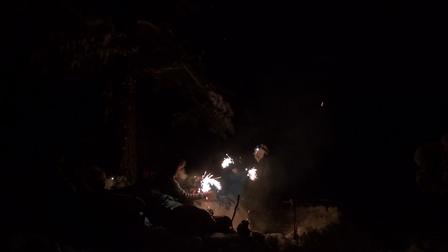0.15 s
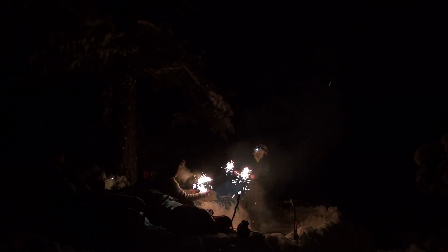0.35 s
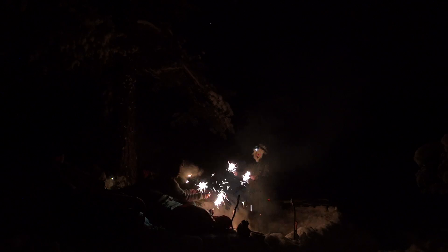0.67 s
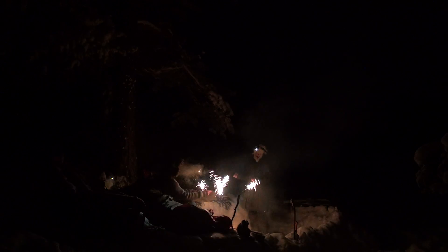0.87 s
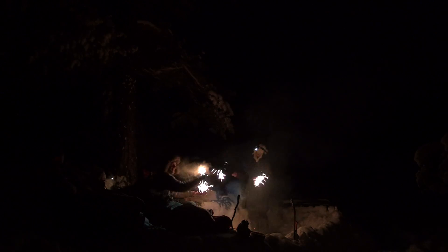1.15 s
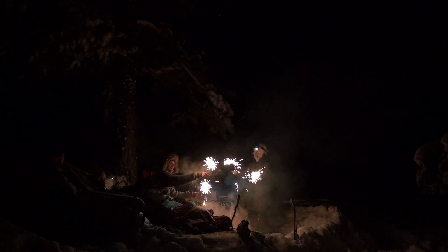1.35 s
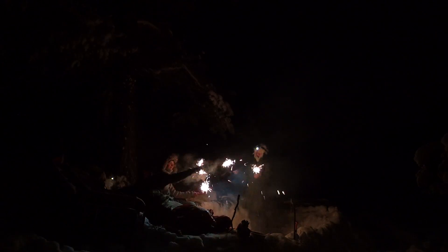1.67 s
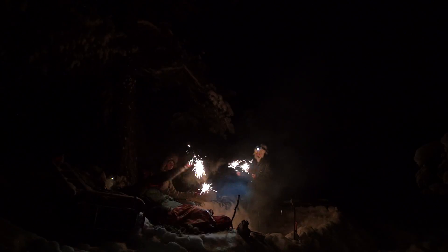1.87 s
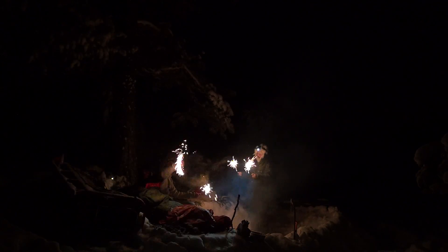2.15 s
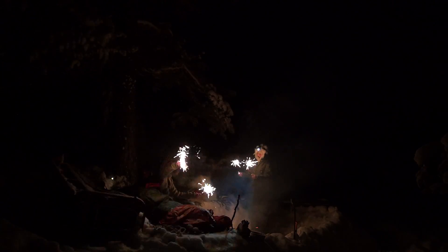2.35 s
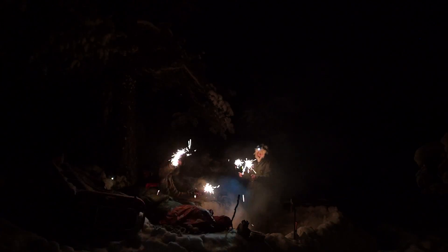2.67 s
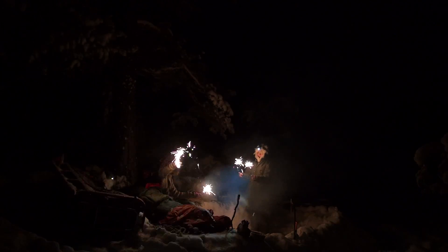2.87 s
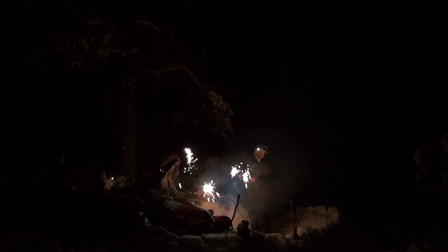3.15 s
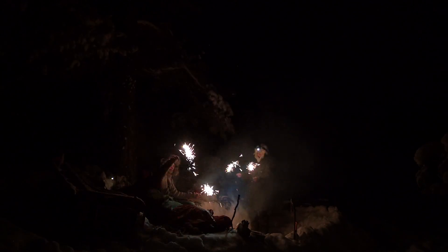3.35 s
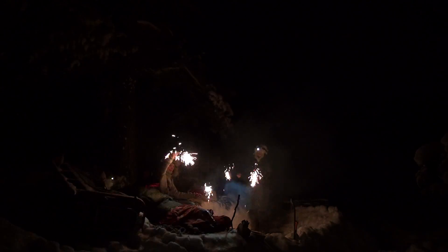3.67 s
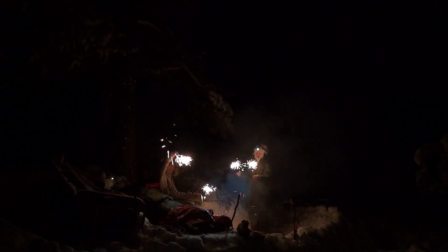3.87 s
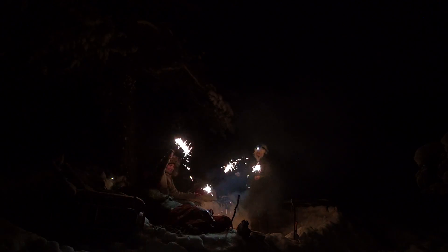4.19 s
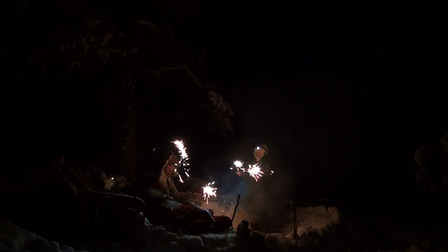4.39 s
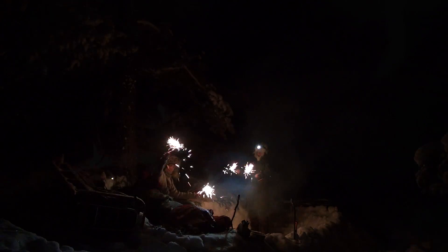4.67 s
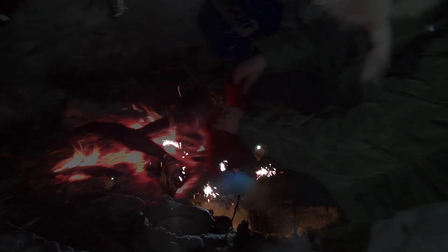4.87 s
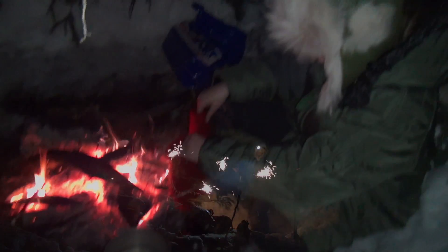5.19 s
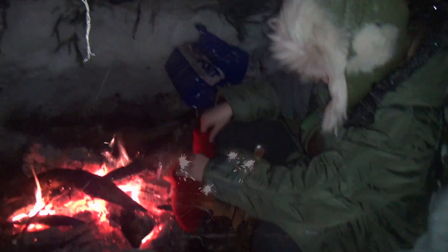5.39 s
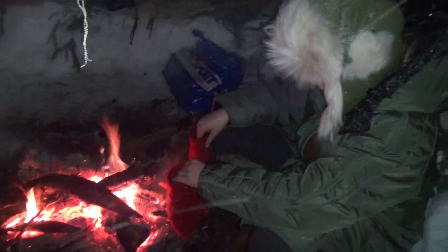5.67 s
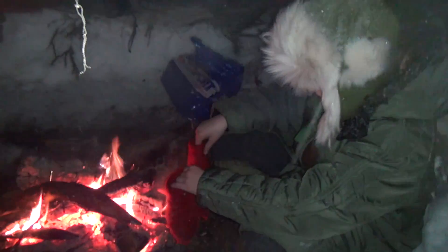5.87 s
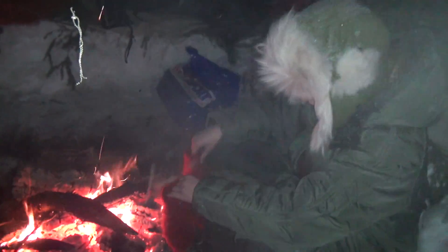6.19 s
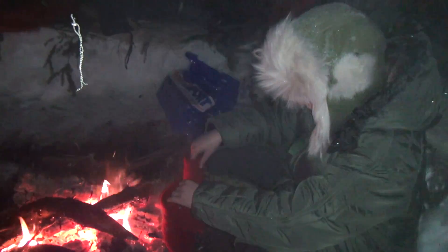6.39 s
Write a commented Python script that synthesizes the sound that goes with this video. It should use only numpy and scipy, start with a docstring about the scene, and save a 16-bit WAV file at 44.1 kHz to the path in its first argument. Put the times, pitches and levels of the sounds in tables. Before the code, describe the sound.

A bright, flickering sparkler hiss with sudden cracks and dull distant fire pops gives way to quiet nearby crackling embers and someone's soft scuffs.

```python
"""A clearing on a still winter night: sparklers fizz a few steps away, as rushing gas and sputtering specks of noise.
Now and then a spark bursts in a sharp crack; the ground answers at once, the nearby trees swell a moment later.
A campfire pops dully behind them, each pop one blunt filtered pulse. The fizz fades as the fire comes close:
a soft flame murmur of low noise, snapping wood made of pulses through resonances, and faint ticks.
Someone tends it with dull knocks, grainy crunches, a sliding sleeve and a rustle of stirred embers."""
import sys
import numpy as np
from scipy import signal
from scipy.fft import rfft, irfft, next_fast_len
from scipy.io import wavfile
from scipy.ndimage import map_coordinates

SR = 44100
rng = np.random.default_rng(int(sys.argv[2]) if len(sys.argv) > 2 else 0)


def master(y):
    """Save y as 16-bit WAV."""
    cut = np.clip(np.atleast_2d(y).T, -1, 1)
    pcm = np.round(cut * 32767)  # scale
    wavfile.write(sys.argv[1], SR, pcm.astype(np.int16))


N = 287973
T = np.arange(8192) / SR  # time axis of one short sound, s


def amp(db):
    """Decibels to gain."""
    return 10 ** (np.asarray(db) / 20)


def unit(x):
    """Scaled to rms 1."""
    return x / np.sqrt(np.mean(x ** 2) + 1e-20)


def along(points, hz):
    """Points of (frequency, value) read on a log frequency axis."""
    point_hz, value = np.transpose(points)
    return np.interp(np.log(hz + 1), np.log(point_hz + 1), value)


def curves(rows):
    """One value per sample for each column after the time."""
    times_s, *columns = np.transpose(rows)
    return [np.interp(np.arange(N) / SR, times_s, column) for column in columns]


def wobble(rate):
    """A smooth random curve with this many knots a second."""
    knots = rng.standard_normal(int(N * rate / SR) + 4)
    return map_coordinates(knots, [np.arange(N) * rate / SR])


def ramp(start_s, length_s):
    """A straight rise from 0 to 1, one value per sample."""
    return np.clip((np.arange(N) / SR - start_s) / length_s, 0, 1)


def filtered(x, response):
    """x times a response of frequency."""
    n = x.shape[-1]
    padded = next_fast_len(n + len(T))
    hz = np.fft.rfftfreq(padded, 1 / SR)
    return irfft(rfft(x, padded) * response(hz), padded)[..., :n]


def coloured(x, spectrum):
    """x shaped by (Hz, dB) points, at rms 1."""
    return unit(filtered(x, lambda hz: amp(along(spectrum, hz))))


def struck(x, spectrum):
    """A short sound through a minimum-phase filter of (Hz, dB) points: nothing comes before the attack."""
    n = len(x)
    cepstrum = irfft(np.log(amp(along(spectrum, np.fft.rfftfreq(n, 1 / SR)))))
    # folding the cepstrum onto positive time makes the filter causal
    fold = np.r_[1, np.full(n // 2 - 1, 2), 1, np.zeros(n // 2 - 1)]
    return irfft(rfft(x) * np.exp(rfft(cepstrum * fold)))


def resonances(modes, hz):
    """The causal response of modes given as (Hz, width Hz, dB)."""
    return sum(amp(db) * 1j * hz * width / (centre ** 2 - hz * hz + 1j * hz * width)
               for centre, width, db in modes)


def dying(t60):
    """Noise of energy 1 that falls by 60 dB in t60 seconds."""
    x = rng.standard_normal(len(T)) * amp(-60 * T / t60)
    return x / np.linalg.norm(x)


def grains(rate, spread_db):
    """Random one-sample impulses of log-normal size and either sign, rate a second, at rms 1."""
    size = amp(spread_db * np.clip(rng.standard_normal(N), -3, 2.6))
    hits = rng.random(N) < rate / SR
    return unit(hits * size * rng.choice([-1, 1], N))


def add(track, s, x):
    """Mix x into the track at time s."""
    part = track[max(round(s * SR), 0):][:len(x)]
    part += x[:len(part)]


def ports(source, width):
    """Two microphone ports share one take of a source; a second, scattered take splits them in level and phase."""
    mid = source()
    side = filtered(source(), lambda hz: amp(along(width, hz)) * np.exp(0.9j))
    return np.array([mid + side, mid - side])


def sparklers():
    """Gas rushes from the burning coats while thousands of metal specks flare; both sputter together."""
    # how fiercely they burn: start_s [s], burn_db [dB], before the trim and the fade
    burn = [(0.0, -51), (0.29, -52.5), (0.34, -49), (0.5, -51), (0.57, -48), (0.78, -49), (0.98, -51),
            (1.28, -51), (1.47, -48.5), (1.66, -51), (1.85, -48), (2.22, -50), (2.69, -50.5), (2.95, -48.5),
            (3.23, -50.5), (3.72, -48.5), (3.86, -50.5), (4.03, -48), (4.16, -49), (4.5, -48.5),
            (4.63, -46.5), (4.78, -49), (4.82, -47.5), (5.0, -47.5)]
    # gas rush, broad and mid-heavy: pitch_hz [Hz], level_db [dB per Hz]
    rush_spectrum = [(100, -36), (300, -15), (520, -6.5), (780, -1.5), (1100, -.5), (1800, 0), (2500, -1.5),
                     (3500, -3.2), (5000, -9), (8000, -22), (16000, -45)]
    # sizzling specks, mostly treble: pitch_hz [Hz], level_db [dB per Hz]
    sizzle_spectrum = [(1500, -26), (2600, -8.5), (3600, -7.5), (5000, -7), (6200, -0.5), (7300, 1),
                       (8800, -3), (10700, 0), (12200, -1), (13400, -11), (14500, -5.5), (15700, -10)]
    rush_mean_db, rush_follows = -52.5, 0.805  # before the fade; share of each flare-up in dB
    sizzle_trim_db = 0.47
    fade_start_s, fade_s, rush_fade_db, sizzle_fade_db = 4.712, 1.02, 16, 18

    burn_db, = curves(burn)
    gone = ramp(fade_start_s, fade_s)
    rush_db = rush_mean_db + rush_follows * (burn_db - burn_db.mean()) - rush_fade_db * gone
    sizzle_db = sizzle_trim_db + burn_db - sizzle_fade_db * gone
    # slow surges and quick sputter, in dB
    sputter_db = 0.7 * wobble(14) + 0.95 * wobble(90)

    specks = grains(rate=2500, spread_db=2.5)
    tails = signal.fftconvolve(specks, dying(t60=0.0051))[:N]
    specks = unit(specks + amp(-2.5) * tails)
    # a few larger specks fork with a distinct tick
    forks = amp(-12.5) * grains(rate=130, spread_db=2.5)
    rush = coloured(unit(rng.standard_normal(N) + amp(-10.0) * specks) + forks, rush_spectrum)
    sizzle = coloured(unit(rng.standard_normal(N) + amp(-0.5) * specks) + forks, sizzle_spectrum)
    return amp(rush_db + sputter_db) * rush + amp(sizzle_db + sputter_db) * sizzle


def nearness():
    """0 until the close fire is first heard, 1 once it is fully close."""
    first_s, close_s = 4.8, 6.47
    return ramp(first_s, close_s - first_s)


def murmur():
    """Night air gives way to close flames; both flutter softly as low noise."""
    # draught of the close flames: start_s [s], level_db [dB], before the flutter and the approach
    draught = [(5.4, -54.5), (5.512, -54), (5.908, -66.5), (6.164, -62.5), (6.53, -59)]
    # low flame noise: pitch_hz [Hz], level_db [dB per Hz]
    flame_spectrum = [(25, -52), (70, -24.5), (130, -8.5), (230, -5), (400, -1), (560, 2), (720, 2),
                      (1000, 0.5), (1200, -17), (1800, -9), (4000, -26.5)]
    air_db = -66.5

    draught_db, = curves(draught)
    near = nearness()
    level = (1 - near) * amp(air_db) + near * amp(draught_db)
    flutter = amp(2.2 * wobble(18))
    return level * flutter * coloured(rng.standard_normal(N), flame_spectrum)


def weights(level_db, bright_db, body_db):
    """Low, middle and high weight of a pop: brightness tips the balance, body lifts the middle."""
    return level_db - bright_db, level_db + body_db, level_db + bright_db


def pop(excitation, thump_db, crack_db, snap_db):
    """A burst coloured by its weight in the low, middle and high range."""
    low = [(30, thump_db - 42.5), (230, thump_db - 14.0), (600, thump_db - 7.5),
           (1200, thump_db - 0.5), (2000, (thump_db + crack_db) / 2 - 1.0)]
    middle = [(2750, crack_db - 4), (3700, crack_db - 1.5), (5100, crack_db - 5.0)]
    high = [(7400, snap_db + 0.5), (10800, snap_db - 8.5), (13400, snap_db - 11.5), (15000, snap_db - 15.0)]
    return struck(excitation, low + middle + high)


def bursts():
    """A spark bursts in a pulse and a short spray; the ground returns it and the trees scatter it."""
    # bursting sparks: start_s [s], level_db [dB], bright_db [dB], spray_db [dB against the pulse],
    # ground_db [dB, ground echo], trees_db [dB, answer of the trees]; levels before filtering
    sparks = [(.058, -23.5, 3, 2, -4, -3), (.6455, -20, 4, 0, -9, -6.5), (0.8592, -14, 2, -1.5, 0.5, 5),
              (2.0542, -5, 0.5, -9.5, -8, -5), (2.4529, -14.5, 1, -7, -11.5, -1.5),
              (2.6145, -16.5, -0.5, -18, -14, -7), (3.261, -3.5, 1.5, 7, 0.5, 3.5),
              (3.5785, -11.5, 0.5, -1.5, -3, -4), (4.917, -19, -1.5, -13, -18.5, -15),
              (5.034, -26.5, -5, -12.5, -20, -5.5)]
    bounce_delay_s = 0.0046
    # the late answer drops quickly: twigs peak first in the treble, trunks later and lower
    twigs = np.interp(T, [.015, .02, .026, .08], [0.68, 1.0, 0.3, 0.1])
    trunks = np.interp(T, [.008, .022, .04, .046], [0.1, 0.55, 1.5, 0.45])

    out = np.zeros(N)
    for s, level_db, bright_db, spray_db, ground_db, trees_db in sparks:
        # a burst with more spray has more weight in the middle range
        body_db = 3 + 0.45 * spray_db
        thump_db, crack_db, snap_db = weights(level_db, bright_db, body_db)
        burst = (T == 0) + amp(spray_db) * dying(t60=0.0084)
        add(out, s, pop(burst, thump_db, crack_db, snap_db))

        # rough ground mirrors part of the burst, smears the rest and sends back mostly treble
        mirrored = .6 * burst / np.linalg.norm(burst)
        smeared = 1.13 * dying(t60=0.026)
        bounce = pop(mirrored + smeared, thump_db - 2.5, crack_db - 3.0, snap_db + 7.0)
        add(out, s + bounce_delay_s, amp(ground_db) * bounce)

        # single trunks and branches make the late answer ragged
        ragged_db = 3.0 * map_coordinates(rng.standard_normal(len(T)), [T * 500])
        ragged = amp(trees_db + ragged_db - 1.4)
        from_twigs = twigs * ragged * dying(t60=0.16)
        from_trunks = trunks * ragged * dying(t60=0.2)
        add(out, s, pop(from_twigs, thump_db - 4, crack_db + 1, snap_db + 2))
        add(out, s, pop(from_trunks, thump_db + 5, crack_db + 3.5, snap_db - 5))
    return out


def thuds():
    """Wood pops dully in the distant fire: one blunt pulse with a short noise tail, peaking at its pitch."""
    # distant pops: start_s [s], level_db [dB before filtering], pitch_hz [Hz, spectral peak]
    distant_pops = [(0.297, -16, 403), (2.087, -5.5, 1400), (2.687, -13.5, 2100), (3.687, -9, 650),
                    (3.8855, -6, 1700), (4.228, -12.5, 1480)]
    out = np.zeros(N)
    for s, level_db, hz in distant_pops:
        colour = [(30, -36), (140, -15), (hz / 2, -3), (hz, 0), (2 * hz, -7), (4 * hz, -20), (16000, -30)]
        pulse = (T == 0) + amp(-11) * dying(t60=0.02)
        add(out, s, amp(level_db) * struck(pulse, colour))
    return out


def campfire():
    """Pockets of steam split the wood and ring it briefly; faint ticks grow as the fire nears."""
    # snaps of burning wood: start_s [s], level_db [dB before filtering], bright_db [dB], body_db [dB],
    # pitch_hz [Hz, note of the splitting piece], note_db [dB]
    embers = [(5.124, -22, -2, 1, 7830, 4), (5.221, -19.5, 0.5, -4, 1980, 9.5),
              (5.241, -30, 5, -2, 9000, 4), (5.2958, -31, 8, -13, 10500, 6),
              (5.328, -31, -7, -2, 1700, 7.5), (5.573, -17.5, -10, 0, 1340, 8.5),
              (5.581, -28, 6.5, -3, 10500, 3), (5.6395, -14.5, 6, 5, 1180, 15),
              (5.7048, -25.5, 3.5, -1.5, 10500, 3), (5.7215, -28.5, 6.5, 2, 4000, 2),
              (5.766, -33, 5.5, -2, 7500, 5), (5.8343, -30.5, 5, 3.5, 5000, 5),
              (5.88, -30.5, 5, -3, 10200, 5), (5.978, -31, 5.5, -3, 10000, 4),
              (6.007, -27, 7.5, 1, 1650, 12), (6.018, -35, 8, -5, 11000, 5),
              (6.0685, -35, 7.5, -5.5, 11000, 4), (6.08, -32, 4, 0, 10500, 4),
              (6.1139, -12.5, -1.5, 0, 10200, 15.5), (6.119, -30, 0, -0.5, 10500, 7),
              (6.1336, -22, -6, 3.5, 980, 13), (6.147, -28, 4, -1, 11000, 3),
              (6.1503, -25.5, -15, 3, 2600, 15), (6.2376, -26.5, -6, 1, 1080, 5),
              (6.2572, -30.5, 6, 0, 5000, 2), (6.298, -33.5, 5, -5.5, 7500, 6.5),
              (6.3253, -27.5, 7, 4.5, 3720, -2.5), (6.33, -29.5, -9, 5, 1700, 13),
              (6.4104, -28.5, 1, 12.5, 3780, 13), (6.426, -34, 0, 9, 4300, 4),
              (6.4585, -30, -4, 3.5, 3000, 3), (6.479, -28, 1.5, -2, 1600, 6),
              (6.505, -26, 5.5, 7.5, 2350, 10)]
    # resonances of the firewood: pitch_hz [Hz], width_hz [Hz], level_db [dB]
    wood_modes = [(910, 470, 4.5), (2690, 620, 4), (3650, 410, -1), (5260, 680, 0), (7480, 400, -3.5),
                  (10200, 1830, 3.5)]
    note_q = 13  # frequency of a piece's own note over its width
    neutral_t60_s, doubling_db = 0.016, 14  # ringing of a neutral snap; loss of brightness that doubles it
    ring_at_0_db, ring_growth = 8.5, 0.356  # a stronger snap rings the wood more: dB, dB per dB

    snaps = np.zeros(N)
    for s, level_db, bright_db, body_db, note_hz, note_db in embers:
        modes = [*wood_modes, (note_hz, note_hz / note_q, note_db)]
        thump_db, crack_db, snap_db = weights(level_db, bright_db, body_db)
        ring_db = ring_at_0_db + ring_growth * level_db
        # duller snaps, as from thicker pieces, ring longer
        t60 = neutral_t60_s * 2 ** (-bright_db / doubling_db)
        blow = 0.55 * (T == 0) + 0.64 * dying(t60)
        ring = amp(ring_db) * filtered(blow, lambda hz: 0.2 + resonances(modes, hz))
        split = 0.31 * (T == 0) + 0.5 * dying(t60=0.004)
        add(snaps, s, pop(split + ring, thump_db, crack_db, snap_db))

    ticks = grains(rate=45, spread_db=1.5)
    ticks = ticks + signal.fftconvolve(ticks, dying(t60=0.015))[:N]
    ticks = coloured(ticks, [(200, 4), (1200, -19), (4000, 1), (11000, -1.0), (15000, -10.5)])
    return snaps + amp(-66.0) * nearness() * ticks


def stroke(s, rise_s, hold_s, db):
    """The force of one movement: it swells, holds and dies away by 60 dB."""
    fall_s = 0.12
    return ramp(s, rise_s) * amp(db - 60 * ramp(s + rise_s + hold_s, fall_s))


def scuffs():
    """Movements by the fire: a soft knock rings the wood under a grainy crunch; uneven rubbing joins them."""
    # dull scuffs: start_s [s], level_db [dB before the knock and crunch trims], ring_db [dB, ring of the wood]
    movements = [(4.939, -42.5, -2), (4.984, -42, 3), (5.015, -48, -3), (5.039, -40, -1), (5.404, -51, 5),
                 (5.442, -46.5, 9.5), (5.457, -47, 0.5), (5.922, -45.5, -1), (5.953, -47.5, -5.5),
                 (5.9754, -44, 0), (5.99, -48.5, -2.5), (6.066, -53, 4.5), (6.08, -42, 4.5),
                 (6.1515, -43.5, 2), (6.238, -47.5, -1), (6.245, -52, -1), (6.278, -48, -9)]
    # rubbing between the scuffs: start_s [s], hold_s [s], level_db [dB]
    rubs = [(4.95, .06, -60), (5.59, 0.13, -62), (5.943, 0.053, -57.5), (6.082, 0.026, -58.5)]
    # muffled contact: pitch_hz [Hz], level_db [dB per Hz]
    scuff_spectrum = [(35, -41.5), (70, -11), (120, -26), (230, -4), (420, 2), (530, 3), (660, 1),
                      (860, -2), (1000, 7.5), (1130, -10), (1300, -18), (2400, -16), (5000, -37)]
    # dull ring of the knocked wood: pitch_hz [Hz], width_hz [Hz], level_db [dB]
    log_modes = [(250, 79, -7), (345, 85, -10.5), (535, 98, -3), (780, 110, 1), (975, 67, 5.5),
                 (1140, 100, -4)]
    knock_trim_db, knock_delay_s = 31, 0.001
    crunch_trim_db, crunch_attack_s, crunch_t60_s = -9.0, 0.0026, 0.0777
    rub_rise_s = 0.0092

    force, knocks = np.zeros((2, N))
    for s, level_db, ring_db in movements:
        decay = amp(level_db + crunch_trim_db - 60 * T / crunch_t60_s)
        add(force, s, decay * (1 - np.exp(-T / crunch_attack_s)))
        contact = .6 * (T == 0) + .8 * dying(t60=0.032)
        # the ring is muffled by a two-pole low-pass at 1800 Hz
        ring = filtered(contact, lambda hz: resonances(log_modes, hz) / (1 + 1j * hz / 1800) ** 2)
        knock = 0.56 * struck(contact, scuff_spectrum) + amp(ring_db) * ring
        add(knocks, s + knock_delay_s, amp(level_db + knock_trim_db) * knock)
    rubbing = sum(stroke(s, rub_rise_s, hold_s, db) for s, hold_s, db in rubs)
    crunch = coloured(grains(rate=450, spread_db=3), scuff_spectrum)
    return knocks + np.hypot(force, rubbing) * crunch


def sleeve():
    """Cloth slides smoothly; the rasp of its weave, a narrow noise band, rises as the arm speeds up."""
    # sleeve movements: start_s [s], rise_s [s], hold_s [s], level_db [dB],
    # from_hz [Hz, resonance at the start], to_hz [Hz, at the end]
    swishes = [(6.079, 0.023, .022, -50, 1780, 2534), (6.15, 0.023, .045, -58, 2105, 3060)]
    # smooth cloth noise: pitch_hz [Hz], level_db [dB per Hz]
    cloth_spectrum = [(300, -24), (700, -9), (1000, 2.5), (1300, 2), (1550, -5.5), (1900, 0.5), (2600, -8),
                      (3400, -15), (5000, -23), (15000, -30)]
    weave_q, weave_db = 3, -11  # weave against the smooth cloth

    out = np.zeros(N)
    for s, rise_s, hold_s, db, from_hz, to_hz in swishes:
        hz = from_hz + (to_hz - from_hz) * ramp(s, rise_s + hold_s)
        tone = np.sin(2 * np.pi * np.cumsum(hz) / SR)
        weave = unit(wobble(to_hz / weave_q) * tone)
        cloth = coloured(rng.standard_normal(N), cloth_spectrum)
        out += stroke(s, rise_s, hold_s, db) * unit(cloth + amp(weave_db) * weave)
    return out


def rustle():
    """Stirred embers rub and crumble in clumps of dry grains."""
    # stirring of the embers: start_s [s], rise_s [s], hold_s [s], level_db [dB before clumping]
    stirs = [(6.294, 0.094, .12, -58)]
    # dry rustle: pitch_hz [Hz], level_db [dB per Hz]
    rustle_spectrum = [(400, -27), (980, 6), (1350, 0), (1550, 0), (1850, -6), (2400, -4.5), (2750, -13),
                       (3150, -5), (4000, -13), (5000, -14), (9000, -29), (15000, -31)]
    clumps = amp(2.0 * wobble(120))
    crumbs = grains(rate=1500, spread_db=3.0) * clumps
    return sum(stroke(*stir) for stir in stirs) * coloured(crumbs, rustle_spectrum)


def clearing():
    """The steady sounds from straight ahead."""
    return sparklers() + murmur()


def cracks():
    """The bursting sparks and the distant fire's pops, with one shared spread."""
    return bursts() + thuds()


def fireside():
    """Everything that sounds within reach."""
    return campfire() + scuffs() + sleeve() + rustle()


def scene():
    """The steady sounds and bursts have little side in the treble; the close fire spreads wider."""
    # spread across the ports of steady sounds, of bursts and echoes, and of the close fire:
    # pitch_hz [Hz], side_db [dB, side against mid]
    steady_width = [(30, -3), (90, -17), (200, -17), (700, -16), (1300, -16), (2500, -15), (3800, -61),
                    (12000, -61)]
    burst_width = [(200, -29), (1000, -19), (4000, -31), (12000, -40)]
    near_width = [(60, -29), (240, -23.5), (480, -19), (950, -8.5), (1900, -3.5), (3800, -8), (7500, -15),
                  (15000, -19.5)]
    return ports(clearing, steady_width) + ports(cracks, burst_width) + ports(fireside, near_width)


def record(dry):
    """A steep band limit: nothing above it remains."""
    top_hz = 15950
    return filtered(dry, lambda hz: hz < top_hz)


dry = scene()
out = record(dry)
master(out)
```